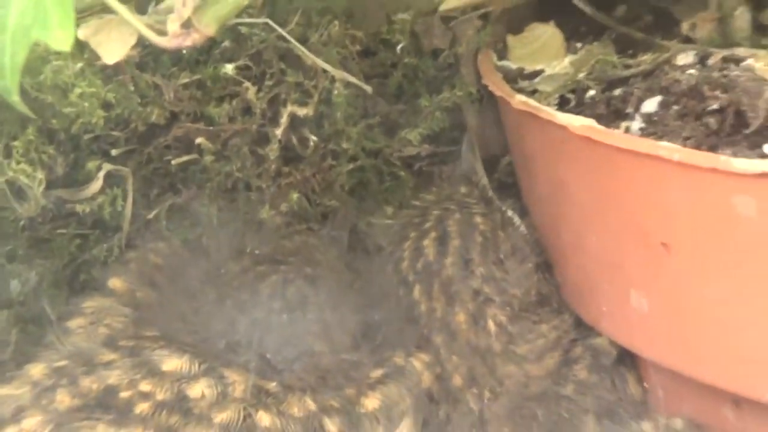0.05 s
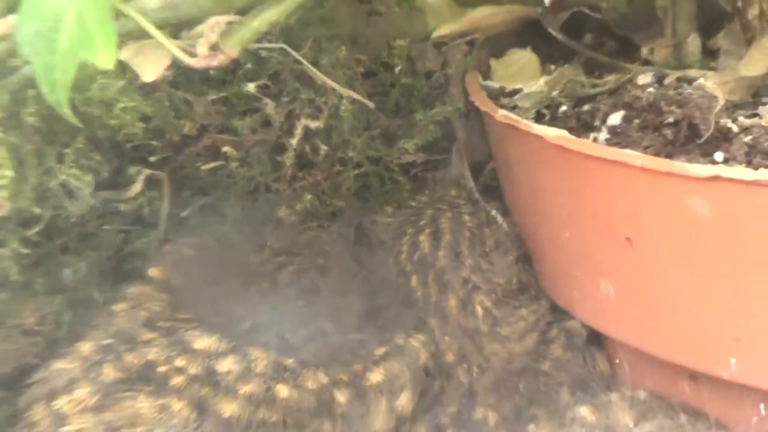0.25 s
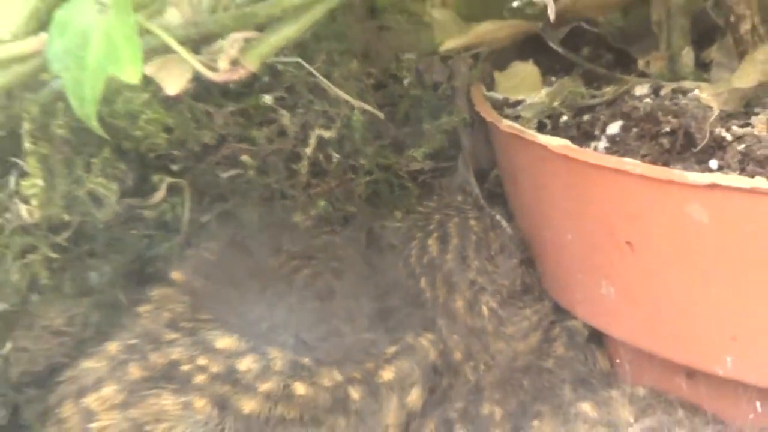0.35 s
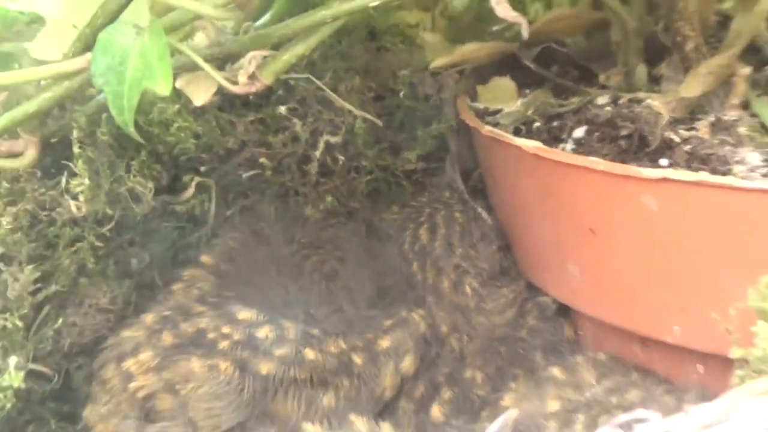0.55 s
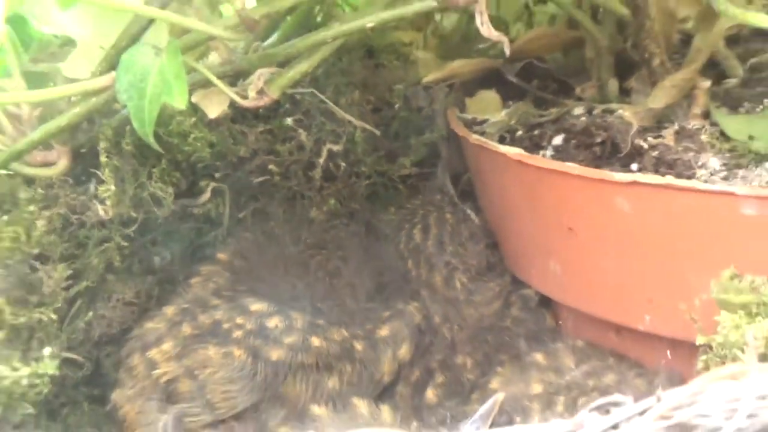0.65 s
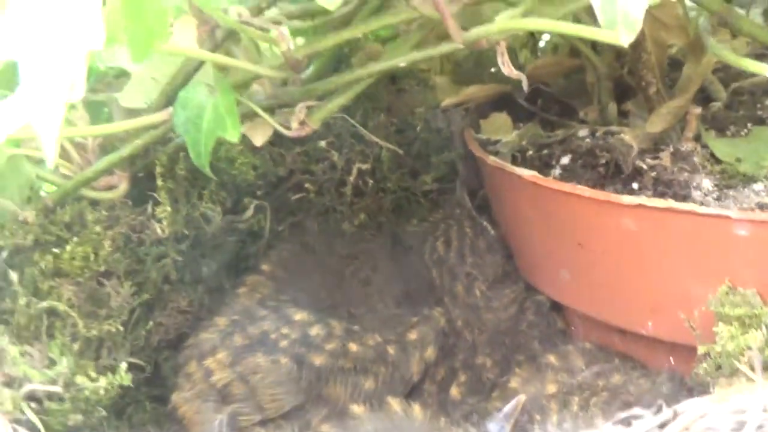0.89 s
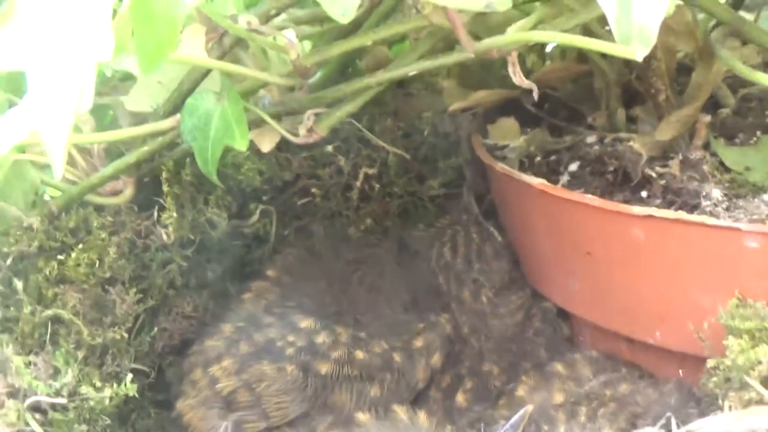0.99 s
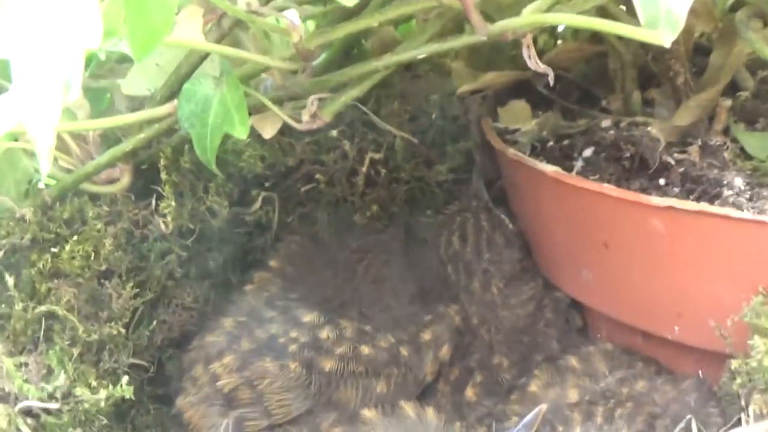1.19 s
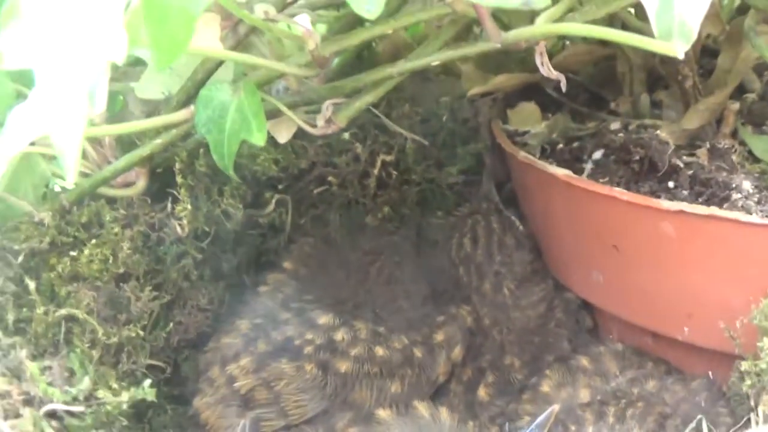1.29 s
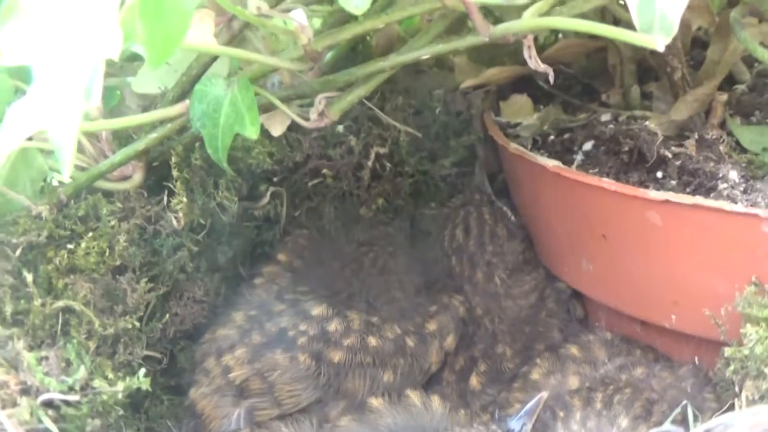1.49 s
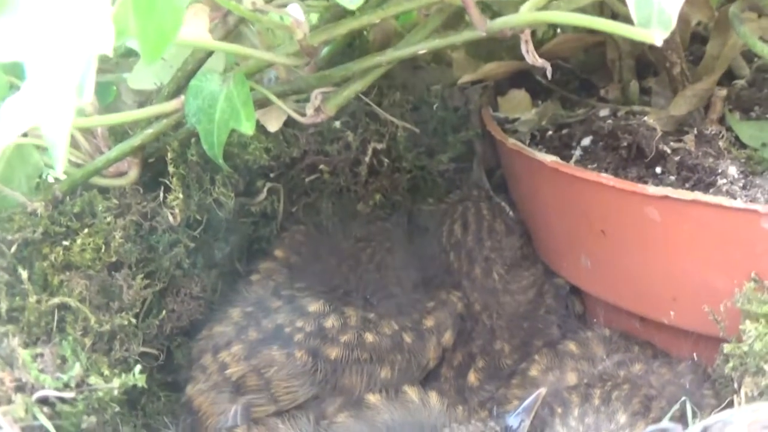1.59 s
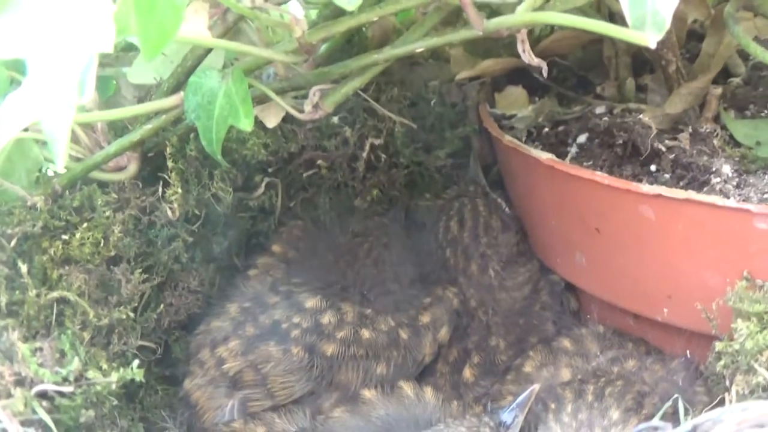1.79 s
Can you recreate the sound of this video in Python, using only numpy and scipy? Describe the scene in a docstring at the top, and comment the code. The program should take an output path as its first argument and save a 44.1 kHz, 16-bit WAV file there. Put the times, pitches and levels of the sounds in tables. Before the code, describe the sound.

Small bird calling close by: a high descending whistle followed by three spaced, clicky chirps in a garden

```python
"""A small bird's thin falling whistle, a frequency-modulated sine, comes first; three two-voiced chirps follow.
The bird calls near a nest among ivy and flowerpots: discrete delays from pot and wall follow the chirps,
and decaying noise tails let all calls ring in the garden. The loudest moments are limited and hard-clipped
at full scale, giving a slight harsh edge. Behind them, shaped noise gives quiet outdoor air, a low rumble
and soft rustles; decaying resonances with noise cracks give small taps."""
import sys
import numpy as np
from scipy import signal
from scipy.fft import rfft, irfft
from scipy.io import wavfile
from scipy.ndimage import uniform_filter1d, minimum_filter1d

SR = 44100
rng = np.random.default_rng(int(sys.argv[2]) if len(sys.argv) > 2 else 0)


def to_wav(s):
    """Save 16-bit WAV."""
    ch = np.atleast_2d(s).T  # columns
    pcm = np.round(np.clip(ch, -1, 1) * 32767)  # PCM
    wavfile.write(sys.argv[1], SR, pcm.astype(np.int16))


N = 81585
T = np.arange(N) / SR

# centre pitch of the whistle, before its waver: (time [s], pitch [Hz])
WHISTLE_PITCH = [(.196, 8300), (.199, 9050), (.208, 8960), (.232, 8620), (.3, 8410), (.35, 8150),
                 (.4, 7950), (.44, 7885), (.475, 7725), (.53, 7640), (.58, 7550), (.61, 7450), (.62, 7330),
                 (.626, 7100)]
# swells of the whistle, before its flutter: (time [s], level [dB])
WHISTLE_LEVEL = [(.199, -17), (.218, -16), (.259, -7.8), (.28, -10), (.297, -17), (.303, -11), (.309, -19),
                 (.315, -8.5), (.323, -12), (.335, -6), (.353, -12), (.385, -3.8), (.397, -3.4),
                 (.403, -6.3), (.435, -2.4), (.441, -9), (.446, -6.5), (.452, -17), (.467, -18),
                 (.477, -8.3), (.515, -6), (.55, -17), (.595, -16), (.608, -21), (.618, -14), (.626, -29)]
# lean of the whistle's direct tone: (time [s], left minus right [dB])
WHISTLE_LEAN = [(0.2, 5), (0.228, 0), (0.282, 8), (0.324, -4), (0.408, 5), (0.446, -0.5), (0.548, 7.5),
                (0.594, -11), (0.625, 15.5)]
# lower voice that kicks the whistle off: (time [s], pitch [Hz], level [dB])
KICK_GLIDE = [(.1955, 4700, -27), (.197, 5450, -15), (.199, 5900, -18), (.202, 6700, -20),
              (.207, 6600, -36)]
# faint tone that lingers after the whistle: (time [s], pitch [Hz], level [dB])
LINGERING_THREAD = [(.62, 7720, -34), (.645, 7620, -26.5), (.69, 7700, -41), (.72, 7530, -41.5),
                    (.748, 7520, -34.5), (.756, 7400, -69)]
# chirps, before the common CHIRP_DB: (start [s], level [dB], reference pitch [Hz], length [s])
CHIRP_EVENTS = [(1.0827, -6.5, 6750, .012), (1.2854, -5, 6950, .0125), (1.5431, -7.5, 6850, .012)]
# main chirp voice, flicking upward: (time [share of length], pitch [share of reference], level [dB])
CHIRP_CONTOUR = [(0, .59, -17), (.08, .65, -9), (.24, .83, -5), (.39, 1.11, 0), (.51, .95, -2),
                 (.67, .99, 0), (.87, 1.02, -6), (1, 1, -19)]
# higher chirp voice: (time [share of length], pitch [share of reference], level [dB])
UPPER_CONTOUR = [(.3, 1.14, -24), (.6, 1.21, -9), (.85, 1.26, -11), (1.1, 1.27, -22)]
# spectrum of the rasp on chirps and kick: (frequency [Hz], level [dB])
RASP_SPECTRUM = [(300, -22), (2800, -28), (4300, -8), (6600, 0.5), (8700, 2.5), (10300, -23), (13000, -8),
                 (16000, -28)]
# reflections from pot and wall: (left delay [s], right delay [s], level [dB])
WALL_REFLECTIONS = [(.0012, 0.00094, -13.5), (.0021, 0.0022, -6), (.0034, 0.0022, -26), (.0046, .0052, -9)]
# spectrum of a call scattered by leaves: (frequency [Hz], level [dB])
SCATTER_SPECTRUM = [(2500, -47), (4200, -15.5), (5500, -6), (6900, 0.5), (8700, -2.5), (9600, -27),
                    (13000, -36.5)]
# taps, before the high-pass: (start [s], level [dB], centre resonance [Hz])
TAP_EVENTS = [(0.7429, -29.5, 2000), (0.746, -24, 1200), (0.75, -26.5, 1080), (0.7573, -35.5, 953.6),
              (1.7105, -38, 1200), (1.714, -27.5, 1280)]
# rustles: (start [s], rise [s], decay constant [s], level [dB])
RUSTLE_EVENTS = [(.03, 0.015, 0.05, -45.5), (0.643, 0.034, 0.071, -34), (.77, 0.041, .08, -52),
                 (1.79, 0.045, .06, -46.5)]
# spectrum of the rustles: (frequency [Hz], level [dB])
RUSTLE_SPECTRUM = [(200, -29.5), (600, -7), (1400, -8.5), (2000, 2.5), (2850, -3), (3250, 3.5),
                   (3700, -5.5), (5500, -3.5), (9200, -6), (11000, -20.5), (16000, -29)]
# relative spectrum of outdoor air, before the high-pass: (frequency [Hz], density [dB per Hz])
AIR_SPECTRUM = [(60, -14.5), (100, -3), (170, -2.5), (245, -1.5), (400, -8), (1000, -8.5), (2050, -12.5),
                (3000, -12.5), (4600, -15.5), (7000, -18.5), (10000, -23.5), (13000, -25), (16000, -23.5)]
# level of the air: (time [s], level [dB])
AIR_LEVEL = [(0, -43), (.6, -45.5), (.85, -46), (1.05, -49), (1.25, -49), (1.5, -46.5), (1.85, -45)]
# left-right likeness of every coloured noise: (frequency [Hz], likeness [0-1])
NOISE_LIKENESS = [(30, 1), (150, 1), (350, .9), (700, .7), (2500, 0.5), (8000, 0.95), (15000, .7)]
# level of the rumble: (time [s], level [dB])
RUMBLE_LEVEL = [(0, -40), (.1, -31), (.17, -34.5), (.22, -21), (.28, -41), (.5, -47), (.7, -41), (.8, -69),
                (1.03, -77), (1.15, -54), (1.5, -45), (1.72, -45.5), (1.84, -34)]
# spectrum of the rumble: (frequency [Hz], level [dB])
RUMBLE_SPECTRUM = [(5, 1), (28, -7), (55, -16), (90, -23), (200, -53.5), (800, -94)]

WAVER_HZ, WAVER_RATE_HZ = 22.04, 190
WHISTLE_OCTAVE_DB, WHISTLE_FLUTTER_DB = -36, .2
WHISTLE_START_S, WHISTLE_END_S, WHISTLE_EDGE_S = .196, .6255, 0.0005
WHISTLE_LEAD_RAD = 0.12  # phase lead of the left fundamental
WHISTLE_NOOK_DB, WHISTLE_GARDEN_DB = -20, -15
CHIRP_DB, CHIRP_PAN_DB = 1.5, 1.5
CHIRP_OCTAVE_DB = 6.5  # before the beak dulls it
CHIRP_ROUGH_HZ, CHIRP_FLUTTER_DB = 250, 3.5
BEAK_HZ, BEAK_ORDER = 8924, 14
RASP_DB, SCATTER_DB = -12.5, -18
NOOK_DB, NOOK_T60_S = -9, 0.079
GARDEN_DB, GARDEN_T60_S = -14.5, .32
TAP_DECAY_S, TAP_WIDTH_HZ = .003, 350
TAP_CRACK_DB, TAP_CRACK_LOW_HZ, TAP_CRACK_HIGH_HZ = -2, 790, 4400
LIMIT_PEAK = 1.07  # full scale is 1
CUT_HZ = 15900


def amp(db):
    """Decibel law: 20 dB is a factor of ten in amplitude."""
    return 10 ** (np.asarray(db) / 20)


def unit(x):
    """Normalisation by mean power: scales to rms 1."""
    return x / np.sqrt(np.mean(x ** 2) + 1e-20)


def curve(points, at, column=1):
    """Linear interpolation between table rows."""
    rows = np.array(points)
    return np.interp(at, rows[:, 0], rows[:, column])


def gate(start, end, edge):
    """Amplitude gating: short linear ramps open and close a sound."""
    return np.clip(np.minimum(T - start, end - T) / edge, 0, 1)


def pan(db):
    """Interaural level difference, split evenly between left and right gains."""
    difference = np.atleast_1d(db)
    return amp(np.array([difference, -difference]) / 2)


def over_hz(points):
    """Interpolation of a spectrum on a logarithmic frequency axis."""
    hz, value = np.transpose(points)
    bins = np.fft.rfftfreq(N, 1 / SR)
    return np.interp(np.log(bins + 1), np.log(hz + 1), value)


def noise(spectrum):
    """Partial coherence: mid and side noise set the stereo likeness, nearly mono in the bass."""
    mid, side = rfft(rng.standard_normal((2, N)))
    likeness = np.clip(over_hz(NOISE_LIKENESS), 0, 1)
    mid = mid * np.sqrt(1 + likeness)
    side = side * np.sqrt(1 - likeness)
    stereo = np.array([mid + side, mid - side])
    return unit(irfft(stereo * amp(over_hz(spectrum)), N))


def wander(rate_hz):
    """Band-limited random modulation: low-passed noise of rms 1."""
    bins = np.fft.rfftfreq(N, 1 / SR)
    spectrum = rfft(rng.standard_normal(N)) / (1 + (bins / rate_hz) ** 4)
    return unit(irfft(spectrum, N))


def phase(hz):
    """Phase as the running integral of frequency."""
    return 2 * np.pi * np.cumsum(hz) / SR


def tail(x, t60, gap_s):
    """Diffuse reverberation: convolution with exponentially decaying noise, different in each ear."""
    t = T[:SR // 2]
    ring = rng.standard_normal((2, len(t))) * amp(-60 * t / t60)
    ring = ring * (t > gap_s)
    ring = ring / np.linalg.norm(ring[0])
    return signal.fftconvolve(np.atleast_2d(x), ring, axes=1)[:, :N]


def glide(points, rough_hz):
    """Frequency modulation: a sine follows rows of time, pitch and level."""
    hz = curve(points, T) + rough_hz * wander(WAVER_RATE_HZ)
    level = amp(curve(points, T, column=2)) * gate(points[0][0], points[-1][0], .001)
    return np.sqrt(2) * np.sin(phase(hz)) * level


def whistle():
    """Frequency and amplitude modulation of a nearly pure falling tone, its left phase leading."""
    hz = curve(WHISTLE_PITCH, T) + WAVER_HZ * wander(WAVER_RATE_HZ)
    turn = phase(hz) + np.array([[WHISTLE_LEAD_RAD], [0]])
    tone = np.sqrt(2) * (np.sin(turn) + amp(WHISTLE_OCTAVE_DB) * np.sin(2 * turn))
    level = amp(curve(WHISTLE_LEVEL, T) + WHISTLE_FLUTTER_DB * wander(rate_hz=410))
    tone = tone * level * gate(WHISTLE_START_S, WHISTLE_END_S, WHISTLE_EDGE_S)
    nook = amp(WHISTLE_NOOK_DB) * tail(tone, NOOK_T60_S, 0.0011)
    garden = amp(WHISTLE_GARDEN_DB) * tail(tone, GARDEN_T60_S, 0.035)
    return tone * pan(curve(WHISTLE_LEAN, T)) + nook + garden + glide(LINGERING_THREAD, rough_hz=35)


def chirp_voice(contour, start, db, pitch_hz, length):
    """Source and filter: one side of the syrinx flutters; the beak dulls its octave as it climbs."""
    share = (T - start) / length
    hz = pitch_hz * curve(contour, share) + CHIRP_ROUGH_HZ * wander(rate_hz=630)
    turn = phase(hz)
    beak = 1 / np.sqrt(1 + abs(2 * hz / BEAK_HZ) ** (2 * BEAK_ORDER))
    octave = amp(CHIRP_OCTAVE_DB) * beak
    level = amp(db + curve(contour, share, column=2) + CHIRP_FLUTTER_DB * wander(rate_hz=680))
    level = level * gate(start + contour[0][0] * length, start + contour[-1][0] * length, 0.0004)
    return level * (np.sin(turn) + octave * np.sin(2 * turn))


def thrown_back(voice):
    """Reflection and scattering: rasp is added; pot and wall give delays, nook and garden tails, leaves a wash."""
    # abs guards against tiny negative rounding errors
    power = abs(uniform_filter1d(voice ** 2, size=60))
    dry = voice + amp(RASP_DB) * np.sqrt(power) * noise(RASP_SPECTRUM)[0]
    near = dry
    for left_s, right_s, db in WALL_REFLECTIONS:
        delayed = [np.roll(dry, round(delay * SR)) for delay in (left_s, right_s)]
        near = near + amp(db) * np.array(delayed)
    # scattered power falls 60 dB in the garden's decay time
    keep = amp(-120 / (GARDEN_T60_S * SR))
    scattered_power = signal.lfilter([1 - keep], [1, -keep], power)
    scatter = np.sqrt(scattered_power) * noise(SCATTER_SPECTRUM)
    nook = amp(NOOK_DB) * tail(dry, NOOK_T60_S, 0.0015)
    garden = amp(GARDEN_DB) * tail(dry, GARDEN_T60_S, 0.0093)
    return near + nook + garden + amp(SCATTER_DB) * scatter


def chirps():
    """Superposition of two voices in each chirp, with the kick that starts the whistle."""
    calls = [glide(KICK_GLIDE, CHIRP_ROUGH_HZ)]
    for event in CHIRP_EVENTS:
        voices = chirp_voice(CHIRP_CONTOUR, *event) + chirp_voice(UPPER_CONTOUR, *event)
        calls.append(amp(CHIRP_DB) * voices)
    return pan(CHIRP_PAN_DB) * sum(thrown_back(call) for call in calls)


def taps():
    """Damped resonance: dull bursts decay exponentially with a band-passed noise crack on top."""
    out = np.zeros(N)
    crack_band = signal.butter(2, (TAP_CRACK_LOW_HZ, TAP_CRACK_HIGH_HZ), "band", fs=SR, output="sos")
    for start, db, hz in TAP_EVENTS:
        age = np.maximum(T - start, 0)
        body = np.sqrt(2) * np.sin(phase(hz + TAP_WIDTH_HZ * wander(rate_hz=400)))
        crack = unit(signal.sosfilt(crack_band, rng.standard_normal(N)))
        level = amp(db) * np.minimum(age / 0.00028, 1) * np.exp(-age / TAP_DECAY_S)
        out += level * (body + amp(TAP_CRACK_DB) * crack)
    out = signal.sosfilt(signal.butter(2, 450, "high", fs=SR, output="sos"), out)
    return out + amp(-7) * tail(out, NOOK_T60_S, 0.0012)


def rustle():
    """Amplitude-modulated noise: soft hisses rise linearly and fade exponentially."""
    level = np.zeros(N)
    for start, rise, decay, db in RUSTLE_EVENTS:
        swell = np.clip((T - start) / rise, 0, 1)
        fade = np.exp(-np.maximum(T - start - rise, 0) / decay)
        level += amp(db) * swell * fade
    return noise(RUSTLE_SPECTRUM) * level * amp(1.8 * wander(rate_hz=130))


def air():
    """Broadband ambient noise: high-passed coloured noise makes a quiet outdoor wash."""
    high_pass = signal.butter(2, 90, "high", fs=SR, output="sos")
    wash = signal.sosfilt(high_pass, noise(AIR_SPECTRUM))
    return unit(wash) * amp(curve(AIR_LEVEL, T))


def rumble():
    """Low-frequency noise under a slow amplitude envelope: an uneven rumble."""
    return noise(RUMBLE_SPECTRUM) * amp(curve(RUMBLE_LEVEL, T))


def scene():
    """Linear superposition of all sources."""
    return whistle() + chirps() + taps() + rustle() + air() + rumble()


def record(dry):
    """Limiting and clipping: fast gain reduction, hard clipping at full scale, then a low-pass."""
    needed_gain = np.minimum(1, LIMIT_PEAK / (abs(dry) + 1e-9))
    held_gain = minimum_filter1d(needed_gain, size=45, axis=1)
    gain = uniform_filter1d(held_gain, size=45, axis=1)
    clipped = np.clip(dry * gain, -1, 1)
    low_pass = signal.firwin(511, CUT_HZ, window=("kaiser", 9), fs=SR)
    return signal.oaconvolve(clipped, low_pass[None], "same")


dry = scene()
out = record(dry)
to_wav(out)
```